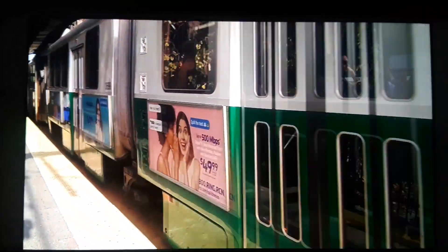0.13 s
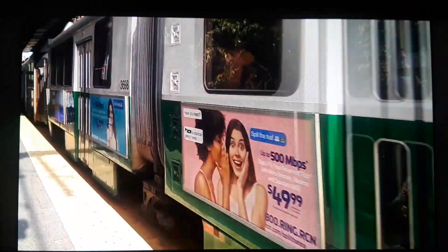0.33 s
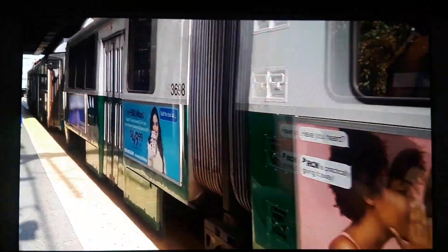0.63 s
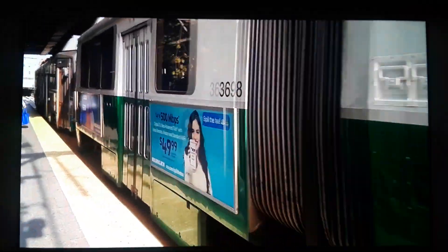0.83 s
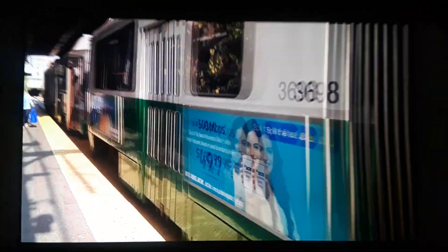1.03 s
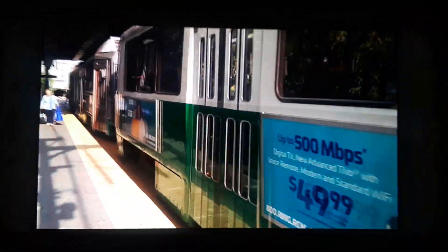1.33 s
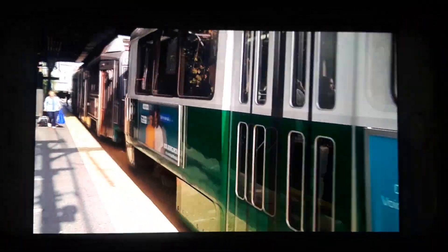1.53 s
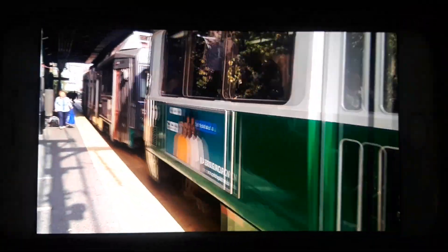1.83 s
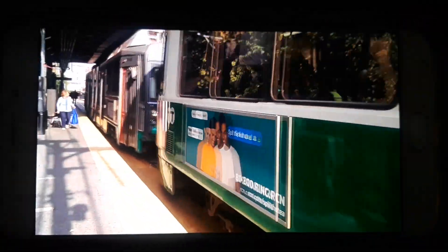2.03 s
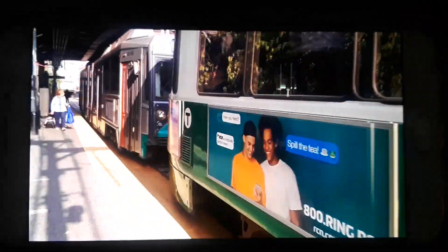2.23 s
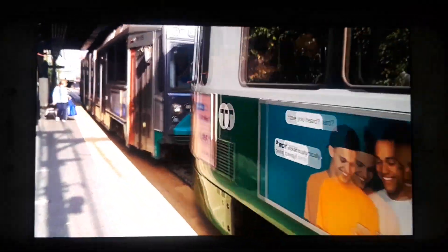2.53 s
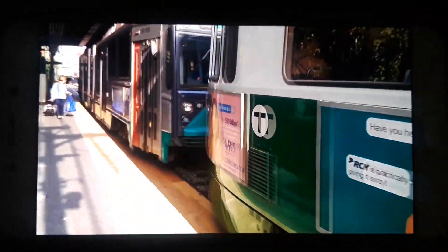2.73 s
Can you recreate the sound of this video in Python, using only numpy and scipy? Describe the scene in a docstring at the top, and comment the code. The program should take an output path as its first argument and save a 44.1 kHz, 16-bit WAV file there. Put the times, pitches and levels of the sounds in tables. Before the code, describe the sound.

Light-rail train rolls past a platform, wheels squealing piercingly over rumble and steely hiss

```python
"""A station platform: a light-rail train rolls past close to a small stereo microphone.
Two wheels squeal: wandering tones at their high modes, with friction hiss and overtones; others chirp.
Rumble and hiss of steel on steel are coloured, flickering noise with rail resonances and faint scrapes.
A brake valve puffs jets of noise, once clearly and once faintly, with a short whistle between.
Behind them lie steady motor and mains hum and a passing gear whine, made of unsteady tones."""
import sys
import numpy as np
from scipy import signal
from scipy.fft import rfft, irfft, next_fast_len
from scipy.io import wavfile
from scipy.ndimage import uniform_filter1d

SR = 44100
rng = np.random.default_rng(int(sys.argv[2]) if len(sys.argv) > 2 else 0)


def invert_db(level):
    """Linear amplitude ratio for a level in decibels (20 dB per decade), elementwise."""
    return 10 ** (np.asarray(level, dtype=float) / 20)


def generate_wav(sig):
    """Save sig (samples, or channels by samples) to the path in sys.argv[1] as 16-bit PCM at SR."""
    pcm = np.round(np.clip(np.atleast_2d(sig).T, -1, 1) * 32767).astype(np.int16)
    wavfile.write(sys.argv[1], SR, pcm)


N = 127449
# frequencies of the spectrum bins [Hz]
HZ = np.fft.rfftfreq(next_fast_len(N), 1 / SR)


def rms_one(x):
    """Scales a signal to an rms of 1."""
    return x / np.sqrt(np.mean(x ** 2) + 1e-20)


def in_time(rows):
    """Draws each column after the time column as a curve over the scene."""
    s, *columns = np.transpose(rows)
    return [np.interp(np.arange(N) / SR, s, c) for c in columns]


def at_hz(points, hz):
    """Reads a (frequency, value) table along a logarithmic frequency axis."""
    p = np.array(points)
    return np.interp(np.log(hz + 1), np.log(p[:, 0] + 1), p[:, 1])


def drift(rate):
    """Slow random wander of rms 1: noise through two equal poles with their corner at rate [Hz]."""
    hop = 40  # samples between computed points
    r = np.exp(-2 * np.pi * rate * hop / SR)
    settle = 2000
    grains = rng.standard_normal(N // hop + 2 + settle)
    slow = signal.lfilter([1], [1, -2 * r, r * r], grains)[settle:]
    return np.interp(np.arange(N) / hop, np.arange(len(slow)), rms_one(slow))


def gate(start, end, rise, fall):
    """Envelope that rises linearly from start and decays exponentially after end; all in seconds."""
    t = np.arange(N) / SR
    return np.clip((t - start) / rise, 0, 1) * np.exp(-np.maximum(t - end, 0) / fall)


def line(hz, wander_hz, steady=0.):
    """A tone of rms 1 whose height and phase wander like a resonance driven by noise."""
    self_limit = 0.043  # how far a singing mode evens out its own height
    wander = np.clip(steady, 0, 3) + drift(wander_hz) + 1j * drift(wander_hz)
    wander = wander / (abs(wander) + 0.22) ** self_limit
    phase = 2 * np.pi * np.cumsum(np.broadcast_to(hz, N)) / SR
    return rms_one(np.real(wander * np.exp(1j * phase)))


def pan(x, lean_db):
    """Places a sound by its left minus right level."""
    return x * invert_db(np.multiply.outer([.5, -.5], lean_db * np.ones(N)))


def noise(spectrum, patchy_db, together_db):
    """Stereo noise whose half-octave bands flicker singly (patchy) around rms 1, then all together."""
    # likeness of the two sides: (frequency [Hz], correlation [0 to 1])
    likeness = [(60, .8), (120, .85), (230, .995), (450, .995), (870, .95), (1700, .95), (3330, .92),
                (6500, .85), (12000, .7)]
    # balance of the two sides: (frequency [Hz], left minus right [dB])
    balance = [(60, -.3), (150, .6), (300, .5), (600, 1.3), (1200, 2.2), (2300, 1.5), (3860, .5),
               (6500, -3)]
    alike = np.clip(at_hz(likeness, HZ), 0, 1)
    mid, side = rng.standard_normal((2, len(HZ))) + 1j * rng.standard_normal((2, len(HZ)))
    common, apart = np.sqrt(1 + alike) * mid, np.sqrt(1 - alike) * side
    both = np.array([common + apart, common - apart])
    both = both * invert_db(at_hz(spectrum, HZ) + np.outer([.5, -.5], at_hz(balance, HZ)))
    # many small resonances of cars and platform
    ripple_db, ripple_hz = 2.5, 25
    knots = np.arange(0, SR / 2 + ripple_hz, ripple_hz)
    both = both * invert_db(ripple_db * np.interp(HZ, knots, rng.standard_normal(len(knots))))
    half_octave = 2 * np.log2(HZ + 1)
    lowest, highest = int(2 * np.log2(spectrum[0][0])), int(2 * np.log2(spectrum[-1][0])) + 1
    out = 0
    for k in range(lowest, highest + 1):
        band = irfft(both * np.clip(1 - abs(half_octave - k), 0, 1))[:, :N]
        out = out + band * invert_db(abs(patchy_db) * drift(12.0))
    return rms_one(out) * invert_db(together_db * drift(14))


def squeal():
    """One wheel mode sings in bursts while neighbouring modes ring more roughly around it at their own levels."""
    # level of the singing mode: (time [s], level [dB])
    bursts = [(.77, -56), (.793, -34), (.808, -16), (.823, -33), (.86, -28), (.872, -36), (.886, -24),
              (.905, -36), (.922, -24), (.933, -32), (.945, -19), (.953, -21), (.965, -10), (.979, -24),
              (.99, -13), (1.01, -18), (1.019, -32), (1.032, -12), (1.046, -21), (1.105, -22), (1.128, -38),
              (1.14, -24), (1.195, -24), (1.232, -38), (1.264, -24), (1.282, -33), (1.352, -16.5),
              (1.372, -25), (1.496, -28), (1.54, -20), (1.598, -21), (1.612, -13), (1.642, -25.5),
              (1.724, -16.5), (1.748, -30), (1.757, -12), (1.768, -13), (1.785, -27), (1.849, -22.5),
              (1.883, -30), (1.953, -25.5), (1.971, -20.5), (2.068, -15), (2.085, -24), (2.12, -34),
              (2.15, -23), (2.186, -36), (2.254, -31), (2.31, -36), (2.432, -27), (2.478, -38),
              (2.512, -29), (2.6, -48), (2.66, -34), (2.706, -50), (2.756, -34), (2.89, -34.5)]
    # its pitch: (time [s], frequency [Hz])
    pitch = [(.76, 4663), (.95, 4570), (1.15, 4603), (1.45, 4626), (1.7, 4565), (2.05, 4580), (2.89, 4586)]
    # place and neighbours: (time [s], left minus right [dB], level of neighbours [dB])
    place = [(.77, -5, -47), (.9, -4, -33), (1.05, -1.5, -23.5), (1.15, -1, -32), (1.25, -2, -30.5),
             (1.35, -7.5, -28.5), (1.6, -5, -22.5), (1.8, -5, -22.5), (2.0, -6.5, -27.5), (2.2, -4, -29.5),
             (2.45, -3, -26.5), (2.6, -6, -38.5), (2.75, -2, -38), (2.89, -2, -29)]
    # frequencies of the neighbouring modes: [Hz]
    beside_hz = [4382, 4540, 4655, 4768, 4860]
    # the same modes: (relative level [dB], nominal width [Hz], twice the wander rate)
    beside_modes = [(-14, 120), (-5, 70), (-4, 70), (-9, 70), (-15, 120)]
    (db,), (hz,) = in_time(bursts), in_time(pitch)
    lean_db, beside_db = in_time(place)
    tone = invert_db(db) * line(hz, 35, steady=2.6)
    beside = sum(invert_db(d) * line(f, w / 2) for f, (d, w) in zip(beside_hz, beside_modes))
    onset = gate(place[0][0], 9, .01, 1)  # held to the end
    return pan(onset * (tone + invert_db(beside_db) * beside), lean_db)


def second_wheel():
    """Wheel modes near the wandering slip rate sound, the others stay quiet."""
    # level and place: (time [s], level [dB], left minus right [dB])
    slip = [(1.42, -48, -2), (1.428, -48, -4), (1.496, -35.5, 10), (1.602, -34, 7), (1.614, -27, 3.5),
            (1.756, -36, 5.5), (1.802, -29, 2), (1.83, -21, 5.5), (1.87, -33.5, -1), (1.886, -30.5, 7.5),
            (1.96, -46, -4), (1.988, -30, -3), (2.05, -27.5, 8), (2.094, -24.5, 3.5), (2.106, -25, 4.0),
            (2.134, -22.5, 7.5), (2.18, -37, 6.5), (2.192, -30, 9), (2.306, -25.5, 12.5), (2.35, -28, 11),
            (2.362, -35.5, -6), (2.386, -28.5, 9.5), (2.468, -37.5, 7.5), (2.508, -40, -7.5),
            (2.53, -19.5, -12), (2.574, -13, -9.5), (2.606, -27.5, -18.5), (2.626, -19, -8.5),
            (2.672, -18.5, -4.5), (2.774, -16.5, -2.5), (2.858, -25, -4), (2.88, -34, -10.5)]
    # slip rate: (time [s], frequency [Hz])
    slip_rate = [(1.46, 5680), (1.62, 5720), (1.77, 5720), (1.82, 5570), (1.92, 5630), (1.98, 5750),
                 (2.03, 5620), (2.08, 5690), (2.15, 5690), (2.2, 5740), (2.28, 5720), (2.31, 5540),
                 (2.4, 5620), (2.5, 5700), (2.51, 5170), (2.57, 5230), (2.63, 5310), (2.7, 5370),
                 (2.79, 5420), (2.88, 5450)]
    # frequencies of the wheel modes: [Hz]
    mode_hz = [5145, 5248, 5322, 5370, 5452, 5566, 5650, 5735, 5800]
    # the same modes: (strength [dB], nominal width [Hz], twice the wander rate)
    mode_ring = [(-12.5, 45), (2.5, 84), (-6, 58), (-12, 39), (-6.5, 92), (-3.7, 74), (-6.5, 110), (1, 70),
                 (-6, 150)]
    reach_hz = 69.6
    (db, lean_db), (hz,) = in_time(slip), in_time(slip_rate)
    shares = np.array([invert_db(d) * np.exp(-.5 * ((hz - f) / reach_hz) ** 2)
                       for f, (d, w) in zip(mode_hz, mode_ring)])
    shares = shares / np.sqrt((shares ** 2).sum(axis=0) + 1e-9)  # evens out their summed power
    tone = sum(share * line(f, w / 2, steady=.8)
               for share, f, (d, w) in zip(shares, mode_hz, mode_ring))
    onset = gate(slip[0][0], 9, 0.042, 1)  # held to the end
    return pan(onset * invert_db(db) * tone, lean_db)


def chirp(s, length, hz, db, lean_db):
    """A brief rough tone: a wandering line under a short envelope."""
    edge_s = .01
    tone = gate(s, s + length, edge_s, edge_s) * line(hz, 65, steady=0.5)
    return pan(invert_db(db) * tone, lean_db)


def other_wheels():
    """Brief scrapes and chirps of other wheels, each one rough tone."""
    # (start [s], length [s], frequency [Hz], level [dB], left minus right [dB])
    chirps = [(0, 0.053, 3500, -33, 12), (0.133, 0.072, 3480, -29.5, 7), (0.294, 0.033, 4750, -32, -4),
              (0.425, .07, 5120, -32.5, -1), (0.506, 0.062, 3450, -37.5, 10),
              (0.518, 0.066, 4450, -36, -10), (1.277, .07, 5260, -41.5, -18.5),
              (1.636, 0.061, 5340, -37.5, -20.5), (2.664, .05, 3170, -33.5, 3), (2.804, 0.05, 5900, -27, 7),
              (2.862, .04, 6340, -35.5, -24), (2.872, .03, 5080, -26.5, -13)]
    return sum(chirp(*row) for row in chirps)


def overtones(wheels):
    """Squared pressure of the squeals above 7.5 kHz: their octaves and sums of their pitches."""
    high = signal.butter(6, 7500, "high", fs=SR, output="sos")
    return invert_db(-30) * signal.sosfilt(high, wheels ** 2)


def friction(wheels):
    """Rubbing hiss that follows the short-term rms of the squeals, 42 dB below them."""
    # (frequency [Hz], relative density [dB per Hz])
    colour = [(6500, -2.5), (7200, -20.5), (7900, -3), (8700, 7.5), (9600, -0.5), (10800, 5.5),
              (11600, -0.5), (13000, -11), (15500, -45.5)]
    effort = np.sqrt(uniform_filter1d(wheels ** 2, size=1500) + 1e-12)  # 34 ms window
    return invert_db(-42) * effort * noise(colour, patchy_db=3.1, together_db=1.1)


def rolling():
    """Steel on steel: low rumble, and a higher hiss out of which rail and bogie resonances stand."""
    # level of the rumble of wheels and rail: (time [s], level [dB])
    rumble_level = [(0.0, -26), (0.02, -28), (1.65, -29), (2.35, -28), (2.37, -31), (2.6, -31.5),
                    (2.64, -37), (2.89, -29)]
    # (frequency [Hz], relative density [dB per Hz])
    rumble_colour = [(15, -79), (25, -77), (112, -37), (151, -34.5), (248, -10), (325, -10.5), (383, 1.5),
                     (425, 1), (465, -3), (509, 1), (657, -12), (786, -13.5), (900, -37), (1170, -19.5),
                     (1980, -120)]
    # level of the hiss, before 1 dB is added: (time [s], level [dB])
    hiss_level = [(0.0, -24), (0.13, -28), (0.15, -26.5), (0.31, -26.5), (0.75, -28), (0.96, -31.5),
                  (1.1, -32.5), (1.13, -39.5), (1.21, -28.5), (1.23, -38.5), (1.35, -28.5), (1.38, -37.5),
                  (1.42, -32), (1.84, -28), (1.91, -30), (1.95, -37.5), (2.02, -31), (2.16, -30),
                  (2.2, -37), (2.24, -29.5), (2.32, -27), (2.35, -32), (2.49, -26.5), (2.62, -37),
                  (2.7, -31), (2.81, -31.5), (2.84, -27.5), (2.89, -22.5)]
    # (frequency [Hz], relative density [dB per Hz])
    hiss_colour = [(600, -42.5), (800, -6), (1120, -1.5), (1300, -1.5), (1810, -4.5), (2050, -2),
                   (2250, -6), (2760, 0.5), (3280, -4), (3490, 0.5), (4190, -5), (5060, 0), (5500, -4),
                   (5800, -11), (6290, -12), (6950, -22), (7800, -39), (9200, -43.5), (10300, -47.5),
                   (11300, -39), (12300, -54), (15500, -64.5)]
    # rail and bogie: (frequency [Hz], level against the hiss [dB], nominal width [Hz], twice the wander)
    resonances = [(1292, -20.5, 42), (2072, -16.5, 140), (2833, -19, 43), (3170, -25, 16), (3500, -23, 150)]
    # hiss between about 1 and 2.6 kHz against the rest: (time [s], level [dB])
    middle_level = [(0, -3.5), (1.05, 1), (1.2, -2), (1.45, 3.5), (2.5, -1), (2.57, -7), (2.82, -7.5),
                    (2.89, -7.5)]
    hiss = noise(hiss_colour, patchy_db=1.2, together_db=.7)
    hiss = hiss + sum(invert_db(d) * line(f, w / 2) for f, d, w in resonances) + scrapes()
    band = signal.butter(2, [1000, 2600], "band", fs=SR, output="sos")
    hiss = hiss + signal.sosfiltfilt(band, hiss) * (invert_db(in_time(middle_level)[0]) - 1)
    rumble = noise(rumble_colour, patchy_db=2.0, together_db=.8)
    return invert_db(in_time(rumble_level)[0]) * rumble + invert_db(in_time(hiss_level)[0] + 1.0) * hiss


def scrapes():
    """Faint rough streaks spread over the upper hiss, each swelling and drifting on its own."""
    level_db, swing_db, swing_hz = -22, 4, 6  # level is against the hiss
    pitch_wander = .015  # share of the pitch
    out = 0
    for f in np.geomspace(2600, 5600, 12):
        swell = invert_db(level_db + swing_db * drift(swing_hz))
        out = out + swell * line(f * (1 + pitch_wander * drift(2)), 65)
    return out


def brake_valve():
    """Short jets of air whose treble sags as pressure falls; a whistle as the first shuts."""
    # (frequency [Hz], relative density [dB per Hz])
    colour = [(1500, -32), (2000, 3), (3500, 5), (5000, 14.5), (5700, -7.5), (6150, 12), (6600, -8),
              (7300, -2.5), (8200, -17.5), (9500, -27), (11000, -11.5), (13000, -11), (14200, -33.5),
              (15500, -46.5)]
    # (start [s], length [s], level [dB])
    puffs = [(.964, .148, -27), (1.262, .08, -44)]
    # (start [s], length [s], frequency [Hz], level [dB], left minus right [dB])
    whistle = (1.085, .028, 2070, -32, 0)
    rise_s, fall_s, sag_db_per_s = .016, .005, 55
    jet = noise(colour, patchy_db=1.5, together_db=.7)
    treble = signal.sosfilt(signal.butter(4, 7500, "high", fs=SR, output="sos"), jet)
    t = np.arange(N) / SR
    out = chirp(*whistle)
    for s, length, db in puffs:
        sagged = jet + treble * (invert_db(-sag_db_per_s * np.clip(t - s, 0, 1)) - 1)
        out = out + invert_db(db) * gate(s, s + length, rise_s, fall_s) * sagged
    return out


def motors():
    """Motor and mains hum as unsteady low tones, and a gear whine that comes and goes."""
    # hum: (frequency [Hz], rms level [dB], wander rate [Hz])
    hum_lines = [(74, -74, 8), (118, -70, 2.6), (260.4, -47, 13.8), (518.3, -44.5, 6.9), (784, -51.5, 46)]
    # gear whine: (time [s], level [dB])
    whine_level = [(1.25, -66), (1.33, -38), (1.896, -43.5), (1.948, -60), (1.974, -40), (2.278, -35.5),
                   (2.56, -41), (2.651, -54)]
    hum = sum(invert_db(d) * line(f, w, steady=0.82) for f, d, w in hum_lines)
    on = gate(whine_level[0][0], whine_level[-1][0], 0.033, .03)
    whine = line(1011, 20, steady=.3)
    return hum + on * invert_db(in_time(whine_level)[0]) * whine


def scene():
    """All sources as they add up at the platform edge."""
    wheels = squeal() + second_wheel() + other_wheels()
    return wheels + overtones(wheels) + friction(wheels) + rolling() + brake_valve() + motors()


def band_limit(x):
    """A steep low-pass at the top of the band."""
    return signal.sosfilt(signal.butter(12, 15700, fs=SR, output="sos"), x)


def record(dry):
    """The two ports of the small stereo microphone differ in phase with frequency."""
    # (frequency [Hz], phase by which the left port leads [rad])
    port_phase = [(0, .3), (120, .1), (600, -0.2), (1030, -0.38), (1550, 0), (1890, -1.1), (2240, 1.2),
                  (2670, -1.14), (3010, 1.5), (3360, -1.35), (3880, -1.16), (4220, -0.98), (5080, -.3),
                  (5340, 2.37), (5940, -1.4), (6630, 0.85), (9000, 1.4)]
    turn = np.exp(1j * np.outer([.5, -.5], at_hz(port_phase, HZ)))
    size = next_fast_len(N)
    mix = irfft(rfft(dry, size) * turn, size)[:, :N]
    return band_limit(mix)


dry = scene()
out = record(dry)
generate_wav(out)
```